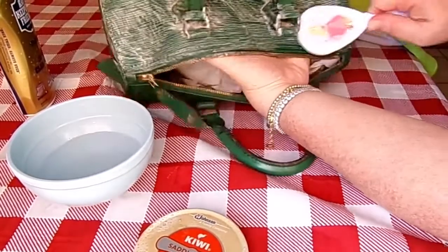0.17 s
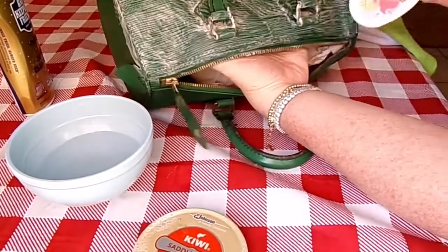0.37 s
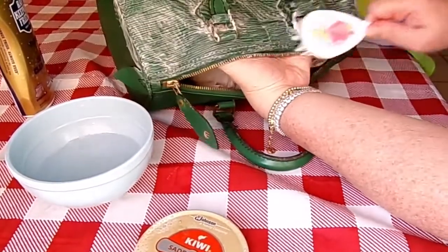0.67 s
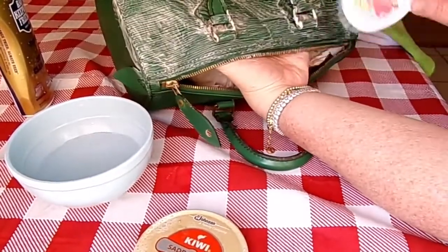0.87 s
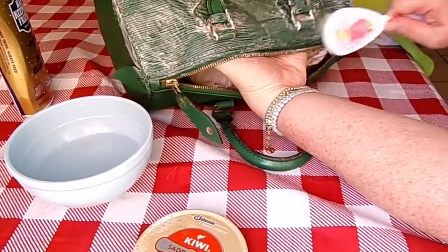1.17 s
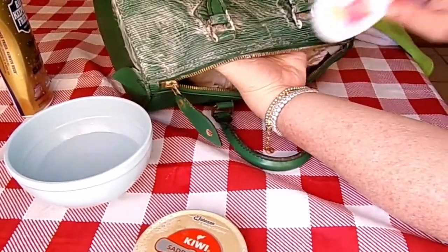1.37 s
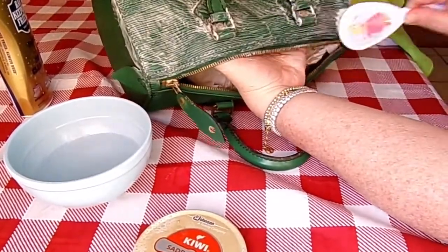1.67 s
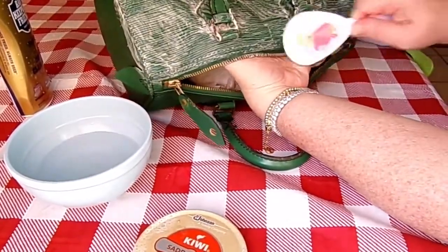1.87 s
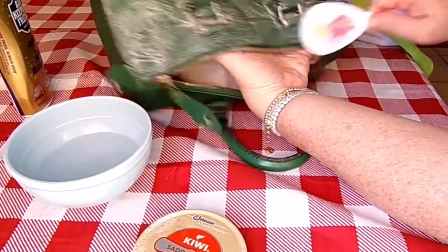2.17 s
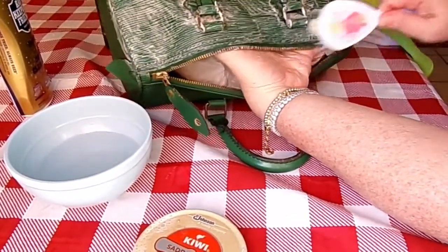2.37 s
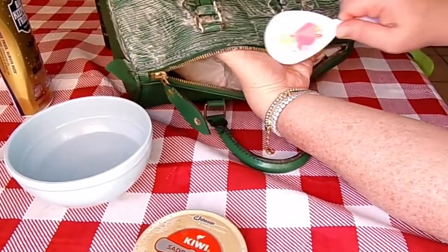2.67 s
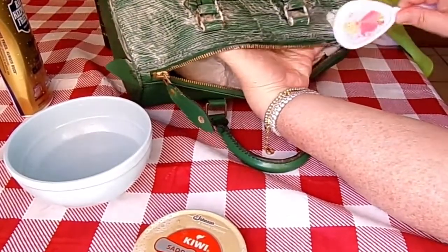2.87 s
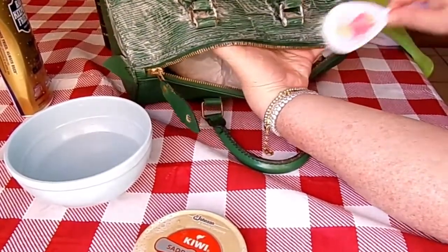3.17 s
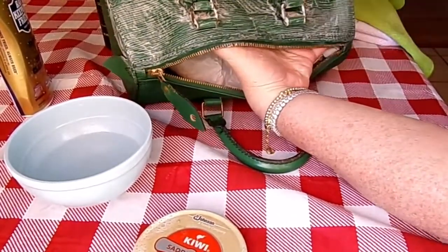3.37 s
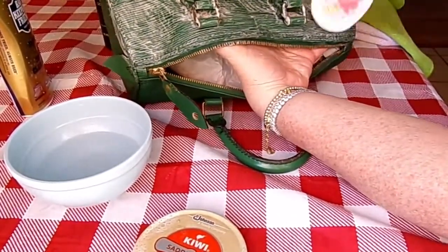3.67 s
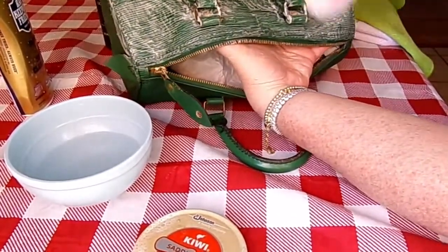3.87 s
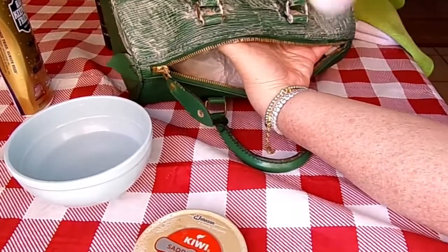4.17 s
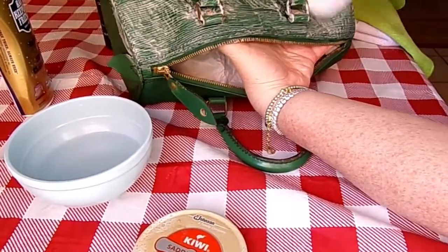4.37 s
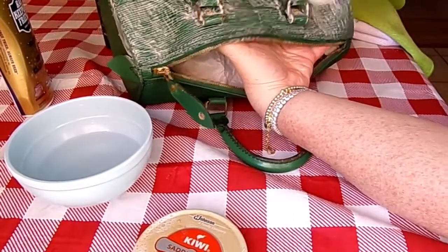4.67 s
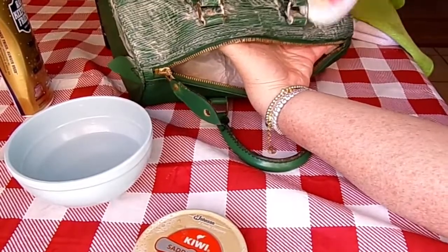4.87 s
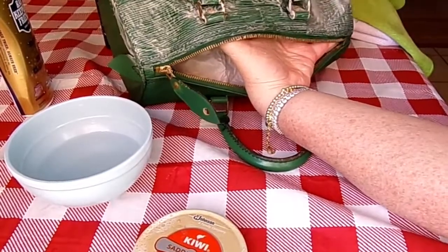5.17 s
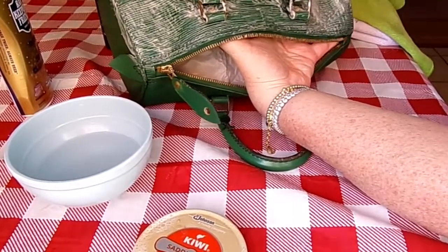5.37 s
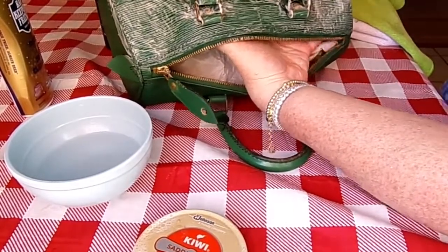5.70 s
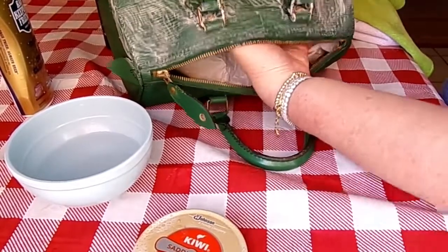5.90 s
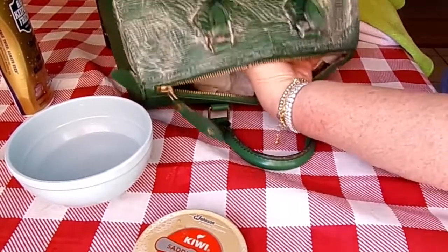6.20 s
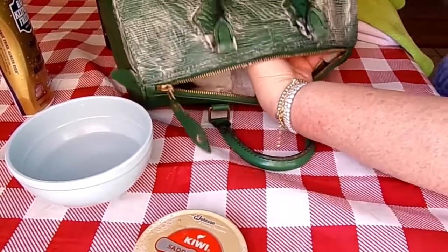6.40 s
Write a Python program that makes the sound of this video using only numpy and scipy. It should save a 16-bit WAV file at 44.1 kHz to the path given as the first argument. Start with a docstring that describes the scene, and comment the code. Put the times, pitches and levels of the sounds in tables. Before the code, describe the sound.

Close up in a small quiet room, a soft brush sweeps slowly over a wet, hollow leather bag, about two strokes a second, each with a light tap or click. Then comes a long run of quick, even back-and-forth scrubbing, louder and raspier, with low bumps. A brief gap holds one lone sweep, and a shorter, softer run of scrubbing ends it.

```python
"""Bristles hiss and leather grain rasps over hollow drumming, as a soft brush scrubs a wet leather handbag
that a hand holds open on a table in a small room. Slow sweeps with taps of the brush head
give way to two runs of even back-and-forth scrubbing, with a lone sweep between them.
Friction is dense random clicks and noise, shaped by resonances and by the speed of each stroke;
taps are dispersed bending waves, and bumps ring the damped modes of the bag."""
import sys
import numpy as np
from scipy import signal
from scipy.fft import rfft, irfft, next_fast_len
from scipy.io import wavfile

SR = 44100
rng = np.random.default_rng(int(sys.argv[2]) if len(sys.argv) > 2 else 0)


def dump_mix(stems):
    """Bounce the given channels to the path in sys.argv[1] as a 16-bit WAV at rate SR."""
    frames = np.atleast_2d(stems).T  # one column per channel
    limited = np.clip(frames, -1, 1)  # hard clip at full scale
    pcm = np.round(limited * 32767).astype(np.int16)
    wavfile.write(sys.argv[1], SR, pcm)


N = 288369
TIME = np.arange(N) / SR
SIZE = next_fast_len(N + SR)
FREQ = np.maximum(np.arange(SIZE // 2 + 1) * SR / SIZE, 1)   # Hz, kept above 0 for logarithms


def scrubbing(drum_trim_db=2.5, ring_share=0.58, bend_share=0.24, judder_db=0.89, judder_hz=45,
              air_hz=10000, flutter_db=2.5):
    """Stick-slip friction: bristles flick over the grain, more often at speed; the bag rubs faintly between strokes."""
    # quiet rubbing of the handled bag, before its offset in each band: start_s, level_db
    rustle_curve = [(0, -55), (.45, -56), (.85, -63.5), (1.72, -58.5), (2.2, -53.5), (3, -54.5),
                    (3.6, -42.5), (5.3, -41), (5.5, -59), (5.9, -44.5), (6.54, -48)]
    # spectra of panel drumming, grain rasp and bristle hiss: freq_hz, density_db (relative, per Hz)
    drumming_colour = [(41, -65), (70, -64), (129, -12), (206, -8), (246, 4), (297, -8.5), (475, -23),
                       (580, -8.5), (716, -17), (1000, -19.5), (1300, -64), (2200, -120)]
    rasp_colour = [(350, -51), (600, 1.5), (710, -21), (1010, -12), (1210, -12), (1720, -9), (2550, -4),
                   (3110, -4), (3680, -4.5), (4000, -2), (4350, -8), (5600, -9.5), (7280, -29),
                   (12300, -120)]
    hiss_colour = [(2590, -33), (4400, -2), (4880, -0.5), (5830, -4.5), (6850, -1), (8010, -10.5),
                   (8460, -1.5), (8930, -3), (11600, -15), (12800, -10.5), (14400, -10), (16000, -10.5)]
    (drum, rasp, hiss), speed = stroke_levels()
    rustle = from_db(np.interp(TIME, *np.transpose(rustle_curve)))
    catches_per_s = 2200 + 7000 * speed

    panel = rms_one(filtered(rng.standard_normal(N), colour(drumming_colour)))
    hollow = rms_one(filtered(flicks(catches_per_s, spread_db=2.0), rfft(bag_ring(), SIZE)))
    grain = rms_one(filtered(flicks(catches_per_s, spread_db=3.5), colour(rasp_colour) * head_colour()))
    swish = bent_bristles(filtered(flicks(catches_per_s, spread_db=6.0), colour(rasp_colour)))
    tip_clicks = flicks(6000 + 25000 * speed, spread_db=5.0)
    tips = rms_one(filtered(tip_clicks, colour(hiss_colour) * head_colour()))

    # the finest hiss flutters on its own
    air = filtered(tips, 1 / (1 + (air_hz / FREQ) ** 8))
    tips = tips + air * (from_db(flutter_db * drift(30)) - 1)

    # independent sounds add in power
    low = np.hypot(drum, rustle * from_db(-5.5)) * blend(panel, hollow, ring_share)
    mid = np.hypot(rasp, rustle * from_db(-4.5)) * blend(grain, swish, bend_share)
    top = np.hypot(hiss, rustle * from_db(-11.5)) * tips
    # rustle's low offset is taken before drum_trim_db
    judder = from_db(judder_db * drift(judder_hz))   # tufts grip and slip together
    return judder * (from_db(drum_trim_db - 1.5 + 1.5) * low + table_echo(mid + top))


def strokes(sweep_drum_db=-5, back_drum_db=-46.5, back_rasp_db=-47, back_hiss_db=-8.5, back_overlap_s=.015,
            pull_fastest=0.5, push_fastest=0.39):
    """Kinematics of the hand: each stroke as start_s, end_s, fastest point (0-1), drumming, rasp and hiss in dB."""
    # long single sweeps: start_s, end_s, fastest (0-1), rasp_db, hiss_db, back_s (light backstroke ahead)
    sweeps = [(0.099, 0.35, 0.32, -41, -47.5, 0.25), (.527, 0.788, 0.41, -42.5, -45, .033),
              (0.958, 1.232, 0.47, -40.5, -45.5, 0.035), (1.4, 1.66, 0.55, -40.5, -44, 0.034),
              (1.833, 2.048, 0.46, -41, -44, .045), (2.234, 2.402, 0.42, -41, -42.5, 0.21),
              (2.611, 2.831, 0.52, -41.5, -43, .225), (3.023, 3.287, 0.53, -41.5, -44, 0.2),
              (5.247, 5.431, 0.16, -36, -37.5, 0.0047)]
    # even runs, pull and push in turn: start_s, stroke_s (first stroke), change_s (per stroke), count,
    # push_db (push louder than pull), drum_db (drumming relative to rasp, before its trim in scrubbing)
    runs = [(3.292, .1172, -.0003, 17, 3.5, -4), (5.758, .129, .002, 6, 2, -1.5)]
    # effort of the hand in the runs, midway between pull and push: start_s, rasp_db, hiss_db
    effort = [(3.3, -40.5, -42.5), (3.5, -35.5, -41.5), (3.85, -35, -35.5), (4.55, -37.5, -41),
              (5.08, -35.5, -39.5), (5.8, -41, -43), (6.2, -41, -42.5), (6.36, -45.5, -43.5),
              (6.5, -43, -42.5)]
    for start, end, fastest, rasp_db, hiss_db, back_s in sweeps:
        # a backstroke only skims the leather and runs on into its sweep
        if back_s > back_overlap_s:
            back_end = start + back_overlap_s
            yield start - back_s, back_end, .5, back_drum_db, back_rasp_db, hiss_db + back_hiss_db
        yield start, end, fastest, rasp_db + sweep_drum_db, rasp_db, hiss_db

    effort_s, *effort_db = np.transpose(effort)
    for start, stroke_s, change_s, count, push_db, drum_db in runs:
        for k in range(round(count)):
            end = start + stroke_s + k * change_s
            push = k % 2
            middle = (start + end) / 2
            rasp_db, hiss_db = (np.interp(middle, effort_s, level) for level in effort_db)
            lean_db = push_db * (push - .5)
            fastest = push_fastest if push else pull_fastest
            yield start, end, fastest, rasp_db + drum_db, rasp_db + lean_db, hiss_db + lean_db
            start = end


def stroke_levels():
    """Friction grows as a power of speed, steepest for hiss, so turns sound dull; rasp and hiss favour the early part."""
    energy, motion = np.zeros((3, N)), np.zeros(N)
    # rows: drumming, rasp, hiss
    powers = np.array([[0.76], [1.04], [1.28]])
    bites_db = np.array([[-0.5], [2.5], [2.0]])   # lift at the start, equal loss at the end
    for start, end, fastest, *levels_db in strokes():
        during = (TIME > start) & (TIME < end)
        progress = (TIME[during] - start) / (end - start)
        half_cycle = np.interp(progress, [0, np.clip(fastest, 0, 1), 1], [0, .5, 1])
        speed = np.abs(np.sin(np.pi * half_cycle))
        bite = from_db(bites_db * (1 - 2 * progress))
        energy[:, during] += (from_db(levels_db)[:, None] * bite * speed ** powers) ** 2
        motion[during] = np.maximum(motion[during], speed)
    return np.sqrt(energy), motion


def flicks(per_s, spread_db):
    """Random impulse train: bristles catch and let go in clicks of uneven size; rms 1."""
    chance = np.clip(per_s / SR, 1e-4, 1)
    sizes = rng.standard_normal(N) * from_db(spread_db * np.clip(rng.standard_normal(N), -2, 2))
    happens = rng.random(N) < chance
    return rms_one(sizes * happens / np.sqrt(chance))   # even power at every rate


def bend_pitch(rest_hz=2487, rise_hz=620, bend_s=0.1, spread=0.077):
    """Bending shifts a resonance: bristles straighten at each turn and bend over again, so it climbs in each stroke."""
    hz = np.full(N, float(rest_hz))
    for start, end, *_ in strokes():
        during = (TIME > start) & (TIME < end)
        bent = 1 - np.exp(-((TIME[during] - start) / bend_s) ** 2)
        # no two strokes bend the bristles alike
        hz[during] = (rest_hz + rise_hz * bent) * (1 + spread * rng.uniform(-0.8, 1))
    return hz


def bent_bristles(x, width_hz=330, size=128):
    """Time-varying resonator: a two-pole filter follows the bend of the bristles; rms 1."""
    out, state = np.zeros(N), np.zeros(2)
    centre = bend_pitch()
    r = np.exp(-np.pi * width_hz / SR)
    for i in range(0, N, size):
        poles = [1, -2 * r * np.cos(2 * np.pi * centre[i] / SR), r * r]
        out[i:i + size], state = signal.lfilter([1, 0, -1], poles, x[i:i + size], zi=state)
    return rms_one(out)


def head_colour():
    """Resonant amplification: the brush head lifts the sound around its own resonances."""
    # resonances of the brush head: freq_hz, width_hz, lift_db
    head = [(1040, 85, 7), (1570, 42, 5), (2030, 46, 5), (2503, 280, 6), (3075, 130, 4), (6140, 120, 4.5)]
    return from_db(sum(db / (1 + (2 * (FREQ - hz) / width) ** 2) for hz, width, db in head))


def taps(spread_s=.0044, scatter_db=-31, scatter_t60=0.16, thump_lag_s=0.00372, crunch_share=0.51, sharp_hz=245):
    """Dispersion: a tap and its crushed bristles send bending waves through the stiff panel, treble first; the bag thumps."""
    # the brush head taps or catches on the leather: start_s, click_db (nominal peak),
    # top_hz (click cutoff), crunch_t60_s, thump_db (before push_db in thump)
    tap_table = [(.121, -25, 4000, .14, -62), (.498, -30.5, 14000, 0.0086, -41.5),
                 (.657, -19, 5000, 0.027, -33), (.929, -27, 12000, .03, -44.5),
                 (1.072, -22, 3500, 0.046, -44), (1.379, -35, 5000, .04, -41.5),
                 (1.517, -22, 3500, .05, -51), (1.792, -29, 12000, 0.023, -53),
                 (1.932, -25, 2500, 0.074, -39.5), (2.077, -19, 5760, .025, -36),
                 (2.468, -19, 9000, .005, -34), (2.904, -15, 10000, .005, -33.5),
                 (5.038, -21.5, 4500, 0.13, -53), (5.753, -29, 6000, .03, -34), (5.85, -19, 3000, .08, -70)]
    # spectrum of a tap: freq_hz, density_db (relative, per Hz)
    click_colour = [(60, -14), (200, -2), (500, -4.5), (1000, -7), (1800, -5), (2700, -0.5), (4000, -5),
                    (6500, -10), (9000, -21), (16000, -19)]
    # delay falls as 1 / sqrt(frequency), reaching zero at fastest_hz
    fastest_hz = 10000
    phase = 2 * np.pi * spread_s * np.sqrt(1000) * (2 * np.sqrt(FREQ) - FREQ / np.sqrt(fastest_hz))
    chirp = colour(click_colour) * head_colour() * np.exp(-1j * phase)
    chirp /= np.abs(irfft(chirp, SIZE)).max()

    blows, low = np.zeros(N), np.zeros(N)
    t = TIME[:SR // 8]
    for s, click_db, top_hz, crunch_t60, thump_db in tap_table:
        crush = decaying_noise(t, crunch_t60)
        scatter = from_db(scatter_db) * decaying_noise(t, scatter_t60)
        blow = blend(t == 0, crush / np.linalg.norm(crush), crunch_share) + scatter
        blow = signal.sosfilt(signal.butter(2, min(top_hz, .45 * SR), fs=SR, output="sos"), blow)
        at = round(s * SR)
        blows[at:at + len(t)] += from_db(click_db) * blow
        low += thump(s + thump_lag_s, thump_db, sharp_hz)
    return filtered(blows, chirp) + low


def bumps():
    """Impulsive excitation: the brush shoves the hollow bag."""
    # shoves of the bag: start_s, level_db (before push_db in thump), sharp_hz (contact sharpness)
    bump_table = [(.002, -41, 404), (.143, -37, 400), (1.112, -39, 400), (1.535, -33.5, 600),
                  (1.955, -36.5, 400), (2.13, -32.5, 302), (2.75, -45, 300), (3.335, -34.5, 300),
                  (3.454, -30, 597), (3.68, -33, 600), (3.772, -37, 450), (4, -25, 260), (4.23, -29, 280),
                  (4.282, -34.5, 450), (4.475, -29, 403), (4.521, -26.5, 510), (4.724, -19.5, 565),
                  (4.956, -19.5, 660), (5.199, -28, 500), (5.392, -41.5, 300), (5.758, -31, 600)]
    return sum(thump(s, level_db, sharp_hz) for s, level_db, sharp_hz in bump_table)


def thump(s, level_db, sharp_hz, drag_s=0.035, push_db=-1.0, rebound_s=.02, rebound_db=-13):
    """Force convolved with modes: push, drag and rebound ring the bag; a soft contact leaves upper modes quiet."""
    count = round(drag_s * SR)
    force = .3 * rng.standard_normal(count) / np.sqrt(count)
    force[0] = 1
    force[min(round(rebound_s * SR), count - 1)] = from_db(rebound_db)
    ring = signal.fftconvolve(force, bag_ring(uneven_db=2.5))
    ring = signal.sosfilt(signal.butter(2, sharp_hz, fs=SR, output="sos"), ring)
    ring *= from_db(level_db + push_db) / np.std(ring[:SR // 30])   # level over the first 1/30 s
    return np.pad(ring, (max(round(s * SR), 0), N))[:N]


def bag_ring(uneven_db=0, low_hz=120.5):
    """Modal decay: one push excites damped modes, each as strongly as the spot that is touched allows."""
    # modes of the hollow bag: freq_hz, level_db (relative), t60_s
    bag_modes = [(136, -16.5, 0.14), (184, -11.5, 0.11), (189, -13.5, 0.16), (249.6, 9.5, 0.16),
                 (280, -24, 0.033), (323.5, -1.5, 0.14), (372, -8, 0.045), (435, -3, 0.023),
                 (550, -3, 0.049), (574, -7, 0.073), (1002, 0.5, 0.02), (1430, -4.5, 0.018)]
    t = TIME[:SR // 3]
    ring = np.zeros(len(t))
    for hz, db, t60 in bag_modes:
        gain = from_db(db + uneven_db * rng.standard_normal())
        ring += gain * np.exp(-np.log(1000) * t / t60) * np.cos(2 * np.pi * hz * t)
    # the bag is too small to radiate the lowest pitches
    return signal.sosfilt(signal.butter(3, low_hz, "high", fs=SR, output="sos"), ring)


def table_echo(x, echo_db=-10, lag_s=.0021, sway=0.115):
    """Comb interference: the table top throws back a close echo whose delay wanders with the hand."""
    lag = lag_s * (1 + sway * drift(1.9))
    return x + from_db(echo_db) * np.interp(TIME - lag, TIME, x)


def room(x, t60_s=0.3, gap_s=0.0058, dull_hz=7000, thin_hz=260):
    """Diffuse reverberation: a short decaying tail, weak in the bass and dull at the top."""
    t = TIME[:SR // 2]
    tail = decaying_noise(t, t60_s) * (t > gap_s)
    walls = FREQ / np.hypot(FREQ, thin_hz) / np.hypot(1, FREQ / dull_hz)
    return filtered(x, rfft(tail / np.linalg.norm(tail), SIZE) * walls)


def room_tone(level_db=-58.5):
    """Stationary coloured noise: the quiet air of the room."""
    # spectrum of the air: freq_hz, density_db (relative, per Hz)
    air_colour = [(20, -10), (60, 0), (120, 0), (250, 0.5), (450, -9.5), (800, -2.5), (1100, -10),
                  (1600, -10.5), (4000, -13), (16000, -49)]
    return from_db(level_db) * rms_one(filtered(rng.standard_normal(N), colour(air_colour)))


def from_db(db):
    """Logarithmic level: decibels to amplitude gain."""
    return 10 ** (np.asarray(db) / 20)


def rms_one(x):
    """Power normalisation: scale to rms 1."""
    return x / np.sqrt(np.mean(x ** 2) + 1e-20)


def colour(points):
    """Spectral envelope: gain at every frequency from (Hz, dB) points, on a logarithmic pitch axis."""
    hz, db = np.transpose(points)
    return from_db(np.interp(np.log(FREQ), np.log(hz), db))


def filtered(x, response):
    """Linear filtering: multiply the spectrum by a frequency response."""
    return irfft(rfft(x, SIZE) * response, SIZE)[:N]


def drift(rate_hz):
    """Low-passed noise: a random wander with rms 1."""
    return rms_one(filtered(rng.standard_normal(N), 1 / (1 + (FREQ / rate_hz) ** 2)))


def decaying_noise(t, t60_s):
    """Exponential decay: noise that falls by 60 dB in t60_s."""
    return rng.standard_normal(len(t)) * np.exp(-np.log(1000) * t / t60_s)


def blend(a, b, share):
    """Power-preserving mix: share is the part of the power given to b."""
    share = np.clip(share, 0, 1)
    return np.sqrt(1 - share) * a + np.sqrt(share) * b


def scene(room_db=-10):
    """Superposition: strokes, taps and bumps in the room, over its quiet tone."""
    # the table reflects the whole friction sound, and its rasp and hiss a second time
    near = table_echo(scrubbing()) + taps() + bumps()
    return (near + from_db(room_db) * room(near) + room_tone())[None]


def record(dry, cutoff_hz=15780):
    """Band-limiting: narrow notches of the microphone colour the sound, and a steep low-pass cuts the top."""
    # microphone notches: freq_hz, width_hz
    mic_dips = [(3682, 210), (4371, 250), (8050, 560), (11714, 700)]
    for hz, width in mic_dips:
        dry = signal.lfilter(*signal.iirnotch(hz, hz / width, fs=SR), dry)
    return signal.sosfilt(signal.ellip(12, .1, 80, cutoff_hz, fs=SR, output="sos"), dry)


dry = scene()
out = record(dry)
dump_mix(out)
```